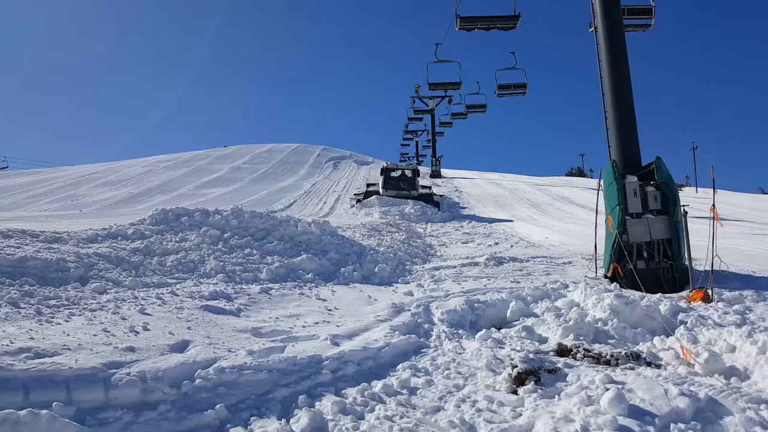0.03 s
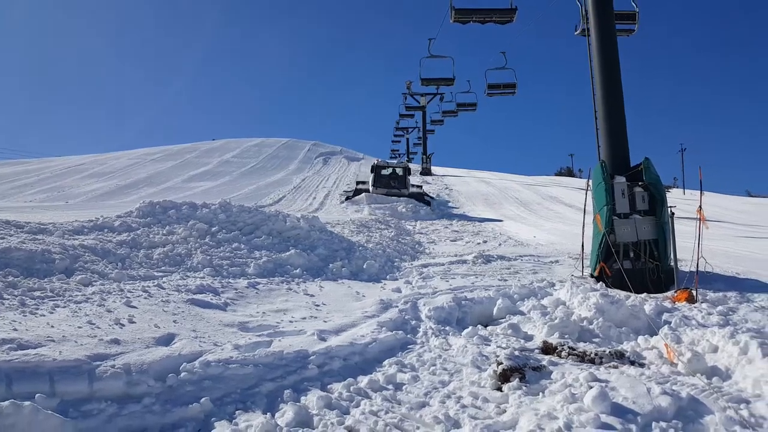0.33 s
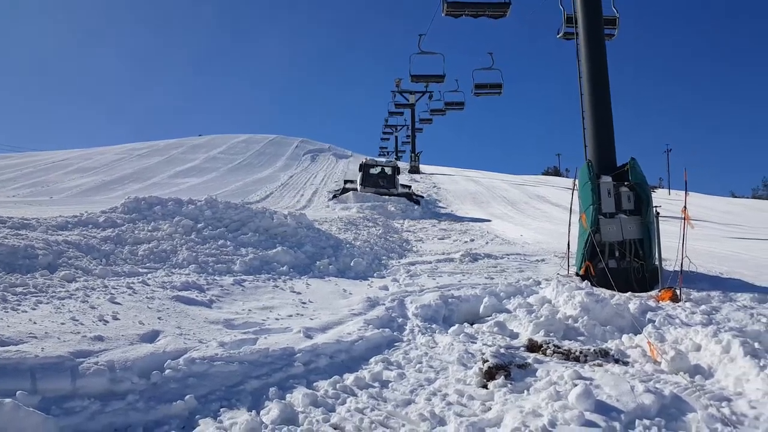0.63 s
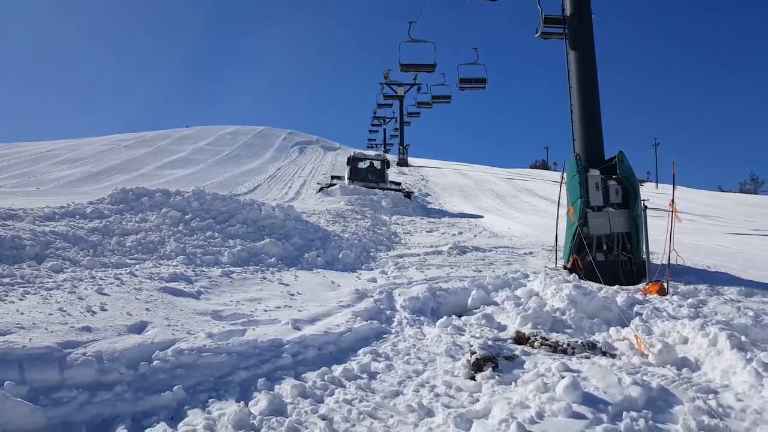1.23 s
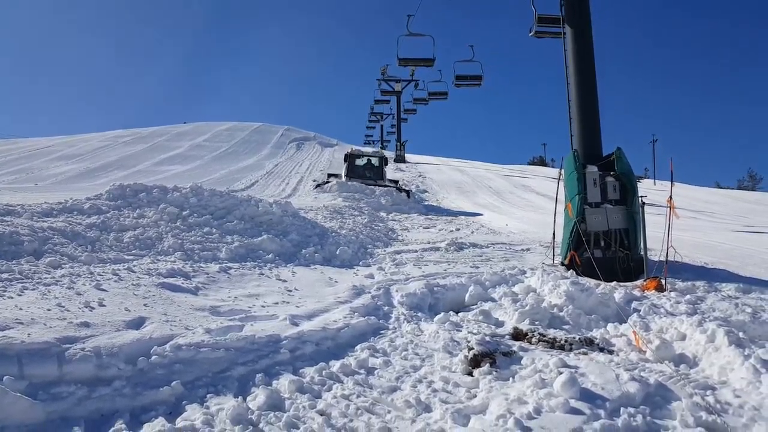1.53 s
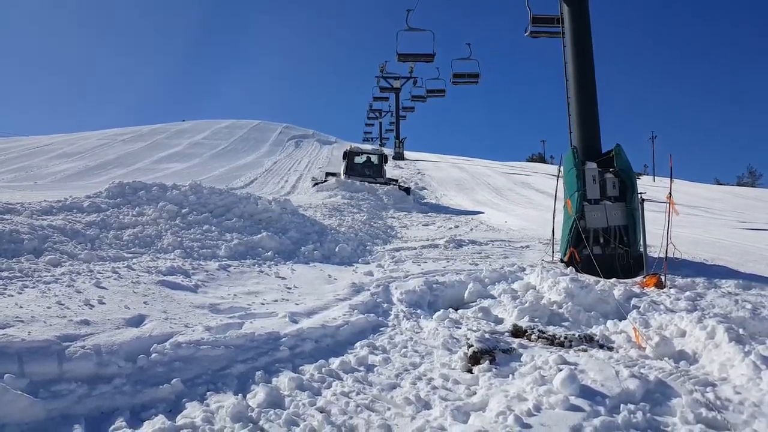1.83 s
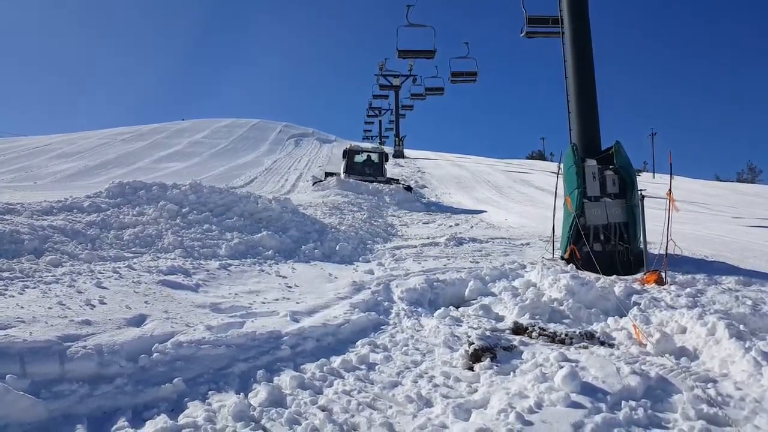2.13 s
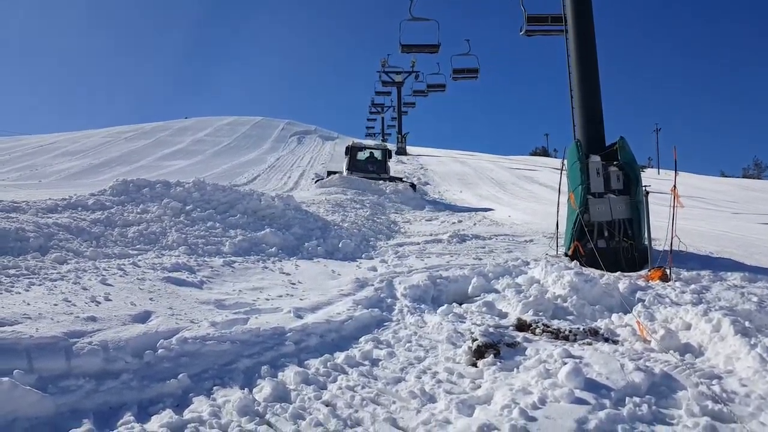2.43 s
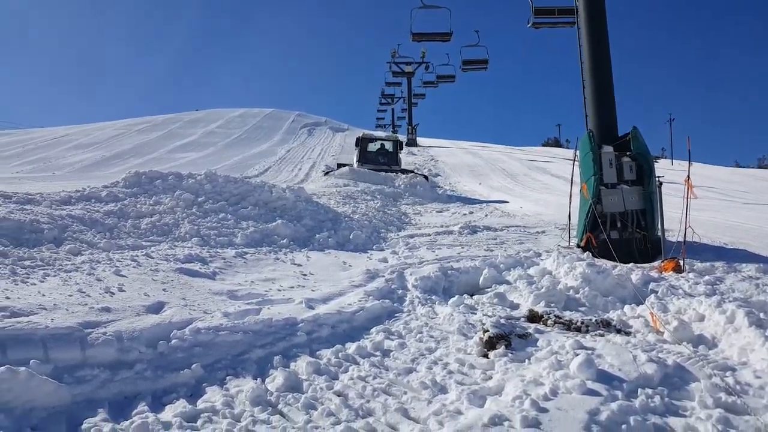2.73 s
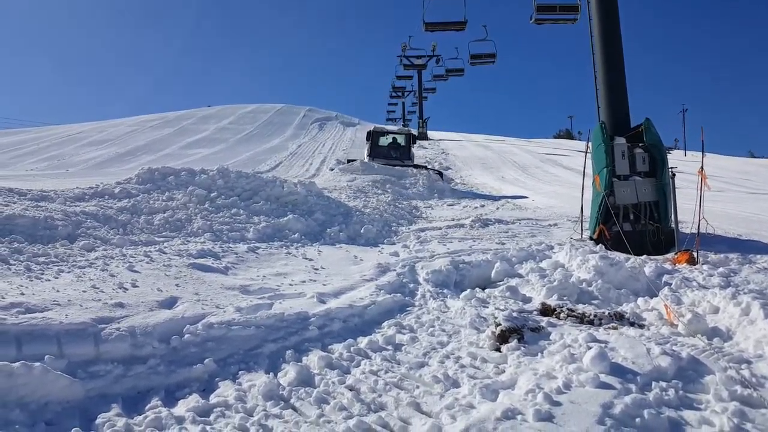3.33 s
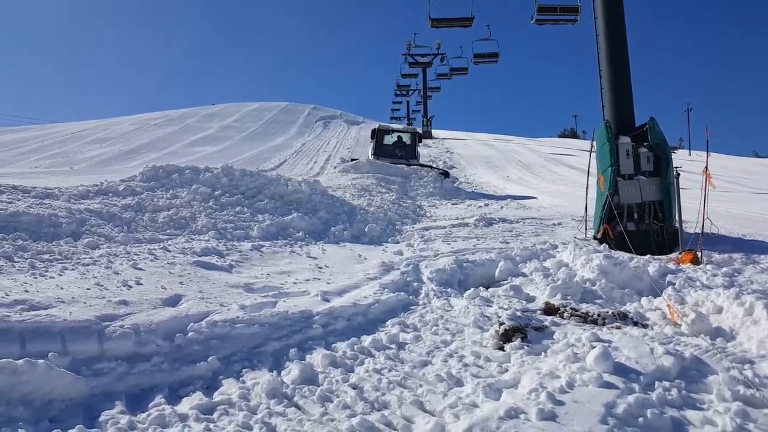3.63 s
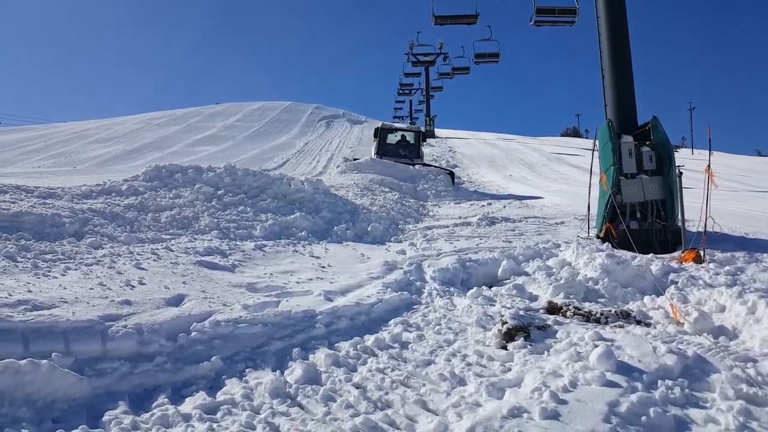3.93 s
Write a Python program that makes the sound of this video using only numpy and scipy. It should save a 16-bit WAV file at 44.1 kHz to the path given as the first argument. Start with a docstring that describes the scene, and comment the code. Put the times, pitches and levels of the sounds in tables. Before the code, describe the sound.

A snow groomer works far up a ski slope, its diesel engine droning and steel tracks rattling. The engine sags briefly, then pulls again. Close to the microphone, clothing rustles and fingers tick and knock, while a light gust passes.

```python
"""A ski slope, a snow groomer working far up it. Its six-cylinder diesel drones, sags briefly and pulls
again; steel cleats clank through the snow and the running gear rattles. Near the microphone, clothing
rustles and the casing ticks, knocks and creaks in the hand. A light gust passes over a low wind rumble.
The sound fades in at the start."""
import sys
import numpy as np
from scipy import signal
from scipy.fft import rfft, irfft, next_fast_len
from scipy.io import wavfile
from scipy.ndimage import map_coordinates

SR = 44100
rng = np.random.default_rng(int(sys.argv[2]) if len(sys.argv) > 2 else 0)


def to_wav(sig):
    """Store sig (one row per channel, or 1-D mono) as 16-bit WAV at the path in sys.argv[1].

    Samples outside -1..1 are clipped; the rate is SR.
    """
    pcm = np.clip(np.atleast_2d(sig), -1, 1) * 32767
    pcm = np.round(pcm).astype(np.int16)
    wavfile.write(sys.argv[1], SR, pcm.T)  # frames by channels


N = 176400

# Crankshaft speed: t/s, f/Hz
SHAFT_SPEED = [(0.5, 25.79), (0.75, 25.57), (1.1, 25.88), (1.35, 25.67), (1.65, 25.38), (1.93, 24.72),
               (2.2, 25.23), (2.38, 25.3), (2.62, 25.79), (2.85, 25.65), (3.15, 25.84), (3.45, 26.06),
               (3.7, 26.13), (3.88, 25.92)]
# Exhaust puff per cylinder, in firing order: level/dB
CYLINDER_PUFFS = [-4, -4, -3, -3, -8, -2]
# Exhaust spectrum: f/Hz, level/dB
EXHAUST_SPECTRUM = [(60, -36), (120, -5.5), (200, 1.5), (320, 3.5), (450, -3), (700, -11.5), (1000, -30),
                    (3000, -42)]
# Engine harmonics: shaft order, cruising level/dB, pulling level/dB
ENGINE_TONES = [(6, -50.5, -48), (9, -53.5, -51.5), (10, -56, -85), (11, -56, -55), (12, -61.5, -50.5),
                (13, -66, -51), (15, -54, -54.5), (16, -51, -76), (20, -70, -60.5), (22, -61, -73)]
# Drive whines: shaft order, cruising level/dB, pulling level/dB
DRIVE_WHINES = [(25.2, -57.5, -63.5), (28.7, -72, -63), (45.7, -65, -76), (47.1, -60.5, -74),
                (49.9, -67, -65)]

def diesel():
    """Three firings a turn: drone, uneven exhaust puffs, shaft harmonics and drive whine."""
    pull_from_s, pull_full_s = 1.36, 2.6
    puff_db, puff_pull_db, puff_decay_firings = -48, 3.2, 0.4
    cruise_db, drone_pull_db, sag_db_per_hz, lead_firings = -38, 1.5, 1.7, 0.13
    shaft_hz = timeline(SHAFT_SPEED)
    turns = np.cumsum(shaft_hz) / SR
    load = np.clip((clock() - pull_from_s) / (pull_full_s - pull_from_s), 0, 1)
    firings = 3 * turns
    index = firings.astype(int)
    size_db = np.take(CYLINDER_PUFFS, index, mode="wrap") + 0.6 * rng.standard_normal(N)[index]
    gate = amp(size_db) * np.exp(-(firings % 1) / puff_decay_firings)
    puffs = amp(puff_db + puff_pull_db * load) * coloured(gate * noise(), EXHAUST_SPECTRUM)
    sag_db = sag_db_per_hz * (shaft_hz - shaft_hz.mean())
    drone_db = cruise_db + drone_pull_db * load + sag_db + 0.77 * wobble(7.02)
    drone = np.sqrt(2) * amp(drone_db) * np.cos(2 * np.pi * (firings + lead_firings))
    harmonics = shaft_tones(ENGINE_TONES, turns, load, waver_db=0.5, drift_rad=0.035)
    whine = shaft_tones(DRIVE_WHINES, turns, load, waver_db=1.0, drift_rad=0.57)
    return drone + puffs + harmonics + whine


def shaft_tones(table, turns, load, waver_db, drift_rad):
    """Shaft-locked tones; higher ones waver more through the air. Waver and drift given at order 10."""
    out = np.zeros(N)
    for order, cruise_db, pull_db in table:
        depth = np.sqrt(order / 10)
        level_db = cruise_db + (pull_db - cruise_db) * load + waver_db * depth * wobble(7.05)
        phase_rad = 2 * np.pi * order * turns + drift_rad * depth * wobble(12)
        out += np.sqrt(2) * amp(level_db) * np.cos(phase_rad)
    return out


# Track envelope: t/s, relative level/dB
TRACK_LEVEL = [(.4, -47), (0.802, -49.5), (0.962, -50), (1.15, -50), (1.45, -48.5), (1.9, -49), (2.2, -48),
               (2.85, -47.5), (3.15, -47), (4, -50.5)]
# Cleat and snow spectrum: f/Hz, level/dB
TRACK_SPECTRUM = [(150, -6), (400, 1), (680, 1), (860, -4), (1050, -7), (1250, -5.5), (1500, -7),
                  (1750, -14.5), (2200, -10.5), (3000, -17), (4200, -15), (5500, -38), (8000, -52),
                  (10000, -40), (15500, -25)]

def tracks():
    """Steel cleats clank densely over the churn of snow."""
    clanks_per_s, decay_s, clank_db, gain_db = 130, 0.0033, -8.5, 2.5
    hits = (rng.random(N) < clanks_per_s / SR) * amp(1.7 * rng.standard_normal(N))
    decays = signal.lfilter([1], [1, -np.exp(-1 / (decay_s * SR))], hits)
    clanks = coloured(decays * noise(), TRACK_SPECTRUM)
    churn = coloured(noise(), TRACK_SPECTRUM) * amp(0.88 * wobble(21.9))
    return amp(timeline(TRACK_LEVEL) + gain_db) * (churn + amp(clank_db) * clanks)


# Running-gear envelope: t/s, level/dB
RATTLE_LEVEL = [(.4, -51), (.85, -57.5), (.97, -60.5), (1.129, -49.5), (1.42, -59.5), (1.9, -67),
                (4, -57.5)]
# Running-gear spectrum: f/Hz, level/dB
RATTLE_SPECTRUM = [(700, -17), (1200, 5.5), (2200, -3.5), (3000, -10), (5200, -14), (7000, -26)]

def gear_rattle():
    """Bright rattle of the running gear, strongest before the load comes on."""
    grains = noise() * amp(3.1 * wobble(120))
    return amp(timeline(RATTLE_LEVEL)) * coloured(grains, RATTLE_SPECTRUM)


# Soft cloth strokes: centre t/s, sigma/s, level/dB
CLOTH_SLIDES = [(.82, 0.062, -57.5), (1.48, 0.083, -59), (1.597, 0.036, -54), (2.21, 0.075, -56),
                (2.42, 0.04, -54), (2.7, 0.041, -51), (3.52, 0.074, -55.5), (3.91, 0.13, -51)]
# Slide spectrum: f/Hz, level/dB
SLIDE_SPECTRUM = [(500, -12), (2000, 5), (4200, 4), (5800, -7), (7900, -5), (9800, -12), (12500, -7),
                  (15500, -22)]
# Gritty strokes: centre t/s, sigma/s, relative level/dB
SCUFF_STROKES = [(1.509, .006, -53), (1.633, 0.0036, -45.5), (1.647, 0.0077, -49.5), (2.342, 0.013, -49),
                 (2.43, 0.014, -53), (2.56, 0.03, -53.5), (2.655, 0.013, -51), (2.764, 0.022, -41.5),
                 (3.9, 0.0091, -50), (3.93, 0.004, -48), (3.975, 0.03, -50.5)]
# Scuff spectrum: f/Hz, level/dB
SCUFF_SPECTRUM = [(300, -2), (1300, -4), (2000, 3.5), (2800, 4), (4300, -0.5), (6000, -17), (7900, -6.5),
                  (9800, -17)]

def cloth_rubs():
    """Cloth slides and scuffs, each stroke made of tiny slips."""
    slides = swells(CLOTH_SLIDES) * coloured(noise() * amp(1.5 * wobble(420)), SLIDE_SPECTRUM)
    scuffs = swells(SCUFF_STROKES) * coloured(noise() * amp(wobble(420)), SCUFF_SPECTRUM)
    return slides + amp(-4) * scuffs


# Casing modes rung by scuffs: f/Hz, level/dB
CASING_MODES = [(1930, -1), (2330, -5), (2780, 3), (3500, -8), (4250, -1), (4750, -5.5), (5700, -13),
                (7650, -8.5), (11800, -13)]

def scuff_grit():
    """Uneven stick-slip; each slip rings the casing with a new mix of its modes."""
    slips_per_s, decay_s, scatter_db, gain_db = 380, 0.0013, 2, -2.5
    slip_count = np.floor(np.cumsum(slips_per_s * amp(4 * wobble(200))) / SR)
    slips = np.diff(slip_count, prepend=0) * amp(scatter_db * wobble(300))
    age_s = np.arange(SR // 20) / SR
    rings = sum(signal.fftconvolve(slips * noise(), ring(age_s, [mode], decay_s)[None], axes=1)[:, :N]
                for mode in CASING_MODES)
    return amp(gain_db) * swells(SCUFF_STROKES) * unit(rings)


# Cloth folds: centre t/s, sigma/s, level/dB
CLOTH_FOLDS = [(1.595, .022, -59), (2.342, .008, -58), (2.42, .025, -69), (2.67, .03, -66),
               (2.763, 0.015, -55), (2.903, 0.009, -59), (2.945, .01, -57), (3.092, .009, -58),
               (3.96, 0.084, -59.5)]
# Snap spectrum: f/Hz, level/dB
SNAP_SPECTRUM = [(1500, -15), (4000, -8), (8000, -7), (10000, 9), (13000, 10), (15500, 4)]

def cloth_crackle(snaps_per_s=1100):
    """Clusters of tiny snaps as stiff cloth folds."""
    snaps = (rng.random(N) < snaps_per_s / SR) * noise()
    return swells(CLOTH_FOLDS) * coloured(snaps, SNAP_SPECTRUM)


# Finger taps: t/s, f/Hz, level/dB
FINGER_TAPS = [(1.616, 1430, -48), (2.655, 2260, -41), (2.753, 1910, -37), (2.949, 1400, -38.5),
               (3.491, 1320, -39.5), (3.897, 2040, -43.5), (3.969, 2120, -45)]

def finger_taps(overtone_ratio=1.43, overtone_db=-7, decay_s=0.0032):
    """Light, hollow taps on the casing, each with one overtone."""
    return sum(ring(clock() - at_s, [(hz, db), (hz * overtone_ratio, db + overtone_db)], decay_s)
               for at_s, hz, db in FINGER_TAPS)


# Finger shifts: centre t/s, sigma/s, relative level/dB
FINGER_SHIFTS = [(1.6, 0.092, -51.5), (2.345, .02, -46), (2.43, 0.032, -51), (2.68, 0.081, -46.5)]
# Finger-rub spectrum: f/Hz, level/dB
GRIP_SPECTRUM = [(100, -10), (300, -4), (480, -3), (1200, -4), (1700, -3), (3000, -29.5)]
# Flex coupling to the microphone ports: left gain, right gain
FLEX_GAINS = [0.83, -1.32]

def grip():
    """Dull, grainy finger rubs flex the casing, pushing the two ports opposite ways."""
    slips = rng.standard_normal(N) * amp(2.3 * wobble(250))
    rubbing = unit(filtered(slips, lambda hz: amp(along(GRIP_SPECTRUM, hz))))
    return np.outer(FLEX_GAINS, swells(FINGER_SHIFTS) * rubbing)


# Casing ticks: t/s, level/dB
CASING_TICKS = [(1.497, -52), (1.587, -50), (1.669, -55), (2.892, -40.5), (2.954, -37.5), (2.961, -51),
                (3.096, -51), (3.929, -49)]
# Tick spectrum: f/Hz, level/dB
TICK_SPECTRUM = [(1000, -23), (4000, -21), (5800, 0.5), (8000, -11), (10000, 5), (13000, 1), (15500, 0.5)]

def casing_ticks():
    """Hard ticks in the hand: a noise burst with a short tail, and one ringing casing mode."""
    burst_s, tail_s, tail_db = 0.0009, 0.013, -11.5
    mode_hz, mode_db, mode_decay_s = 5750, -13, 0.0028
    age_s = np.arange(SR // 10) / SR
    shape = np.exp(-age_s / burst_s) + amp(tail_db) * np.exp(-age_s / tail_s)
    envelope, pings = np.zeros((2, N))
    for at_s, db in CASING_TICKS:
        start = round(at_s * SR)
        envelope[start:start + len(shape)] += amp(db) * shape[:N - start]
        pings += ring(clock() - at_s, [(mode_hz, db + mode_db)], mode_decay_s)
    return envelope * coloured(noise(), TICK_SPECTRUM) + pings


# Casing modes rung by the creak: f/Hz, level/dB
CREAK_PARTIALS = [(2266, -56), (2750, -34.5), (3900, -38), (4400, -40)]

def casing_creak(at_s=1.63, rise_s=0.0014, decay_s=0.0032):
    """The casing creaks once: damped modes with a ramped onset."""
    age_s = clock() - at_s
    return ring(age_s, CREAK_PARTIALS, decay_s) * np.clip(age_s / rise_s, 0, 1)


def casing_knock(at_s=1.579, hz=181, level_db=-23, decay_s=0.0024):
    """A soft knock rings one low, heavily damped mode."""
    return ring(clock() - at_s, [(hz, level_db)], decay_s)


# Squeaks: t/s, length/s, start f/Hz, end f/Hz, relative level/dB
SQUEAK_GLIDES = [(0.567, 0.1, 9600, 8700, -67), (2.51, .07, 9600, 8600, -68)]

def squeaks(jitter_hz=170):
    """Thin, faint falling glides, left of centre."""
    out = np.zeros(N)
    for at_s, length_s, from_hz, to_hz, db in SQUEAK_GLIDES:
        progress = np.clip((clock() - at_s) / length_s, 0, 1)
        hz = from_hz + (to_hz - from_hz) * progress + jitter_hz * wobble(270)
        out += amp(db) * np.sin(np.pi * progress) * np.sin(2 * np.pi * np.cumsum(hz) / SR)
    return out * amp([[3], [-4]])


# Wind rumble spectrum: f/Hz, level/dB
RUMBLE_SPECTRUM = [(24, -30), (35, -5.5), (58, -4), (100, -6), (160, -13), (300, -11), (1000, -47)]
# Gust envelope: t/s, relative level/dB
GUST_LEVEL = [(1.3, -69.5), (1.62, -47), (2.1, -63.5), (2.48, -60), (2.64, -42.5), (3.15, -45.5),
              (3.55, -47), (3.82, -68)]
# Port buffeting spectrum: f/Hz, level/dB
BUFFET_SPECTRUM = [(15, -32), (35, -16), (65, 8), (115, 3.5), (160, -21), (250, -8.5), (600, -40)]

def wind(rumble_db=-45.5):
    """Low, uneven rumble; a gust flutters at each port independently, more at the left."""
    rumble = amp(rumble_db + 2.05 * wobble(6.65)) * coloured(noise(), RUMBLE_SPECTRUM)
    flutter = unit(filtered(noise(), lambda hz: amp(along(BUFFET_SPECTRUM, hz))))
    gust_db = timeline(GUST_LEVEL) + 0.78 * wobble(6.92)
    return rumble + amp(gust_db) * flutter * amp([[2], [-3]])


# Left-right likeness: f/Hz, correlation
PORT_CORRELATION = [(100, 1), (300, 0.98), (480, 0.92), (740, 0.93), (1220, 0.67), (2000, 0.12),
                    (5000, 0.021)]

def coloured(pair, spectrum):
    """Two unrelated signals to shaped stereo of rms 1, alike in the bass."""
    def response(hz):
        angle_rad = np.arccos(np.clip(along(PORT_CORRELATION, hz), -1, 1)) / 2
        return amp(along(spectrum, hz)) * [np.cos(angle_rad), np.sin(angle_rad)]
    mid, side = filtered(pair, response)
    return unit(np.array([mid + side, mid - side]))


def ring(age_s, modes, decay_s):
    """Damped modes (f/Hz, level/dB) starting at age 0."""
    out = np.zeros(len(age_s))
    live = (age_s > 0) & (age_s < 20 * decay_s)
    partials = sum(amp(db) * np.sin(2 * np.pi * hz * age_s[live]) for hz, db in modes)
    out[live] = np.exp(-age_s[live] / decay_s) * partials
    return out


def swells(table):
    """Sum of Gaussian stroke envelopes."""
    return sum(amp(db) * np.exp(-.5 * ((clock() - at_s) / sigma_s) ** 2) for at_s, sigma_s, db in table)


def wobble(rate_hz):
    """Smooth random curve through knots at rate_hz."""
    return map_coordinates(rng.standard_normal(int(N * rate_hz / SR) + 4), [clock() * rate_hz])


def filtered(x, response):
    """Zero-phase filter with gain response(hz)."""
    size = next_fast_len(N + SR // 2)
    return irfft(rfft(x, size) * response(np.fft.rfftfreq(size, 1 / SR)), size)[..., :N]


def along(points, hz):
    """Interpolate (f/Hz, value) on a log axis."""
    knots_hz, values = np.transpose(points)
    return np.interp(np.log(hz + 1), np.log(knots_hz + 1), values)


def timeline(points):
    """Interpolate (t/s, value) at every sample."""
    return np.interp(clock(), *np.transpose(points))


def amp(db):
    return 10 ** (np.asarray(db) / 20)


def unit(x):
    return x / np.sqrt(np.mean(x ** 2) + 1e-20)


def clock():
    return np.arange(N) / SR


def noise():
    return rng.standard_normal((2, N))


def scene():
    """Distant groomer and wind, plus close cloth and hand sounds."""
    slope = diesel() + tracks() + gear_rattle() + wind()
    cloth = cloth_rubs() + cloth_crackle()
    hand = grip() + casing_ticks() + casing_creak() + casing_knock() + finger_taps()
    return slope + cloth + hand + squeaks() + scuff_grit()


# Left port response: f/Hz, level/dB
LEFT_PORT = [(500, 0.5), (1200, 4), (1900, 2), (3100, 1), (4200, -5), (5300, 2.5), (6400, 0.5), (7500, 2.5),
             (8600, 3), (9600, -7.5), (15000, -11)]
# Right port response: f/Hz, level/dB
RIGHT_PORT = [(500, 0.5), (1200, 0.5), (2200, 7.5), (3200, -4.5), (4300, 5), (5300, -2), (6400, -4),
              (7600, 2.5), (8800, -8), (11700, -6.5), (15000, -12)]

def record(dry):
    """Each microphone port colours the sound; fade-in and band limit follow."""
    open_s, fade_s, top_hz = 0.37, 0.34, 15770
    heard = filtered(dry, lambda hz: amp([along(LEFT_PORT, hz), along(RIGHT_PORT, hz)]))
    fade = np.clip((clock() - open_s) / fade_s, 0, 1)
    return filtered(heard * fade, lambda hz: hz < top_hz)


dry = scene()
out = record(dry)
to_wav(out)
```